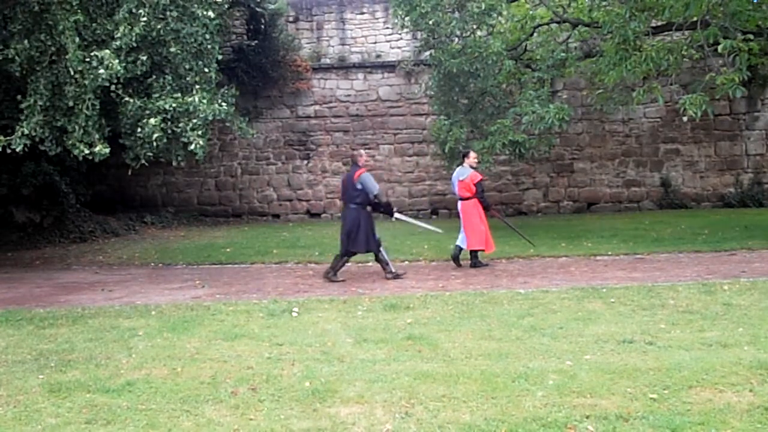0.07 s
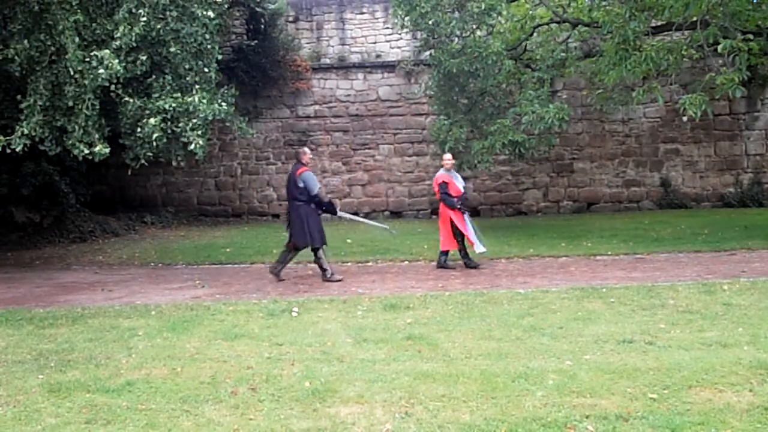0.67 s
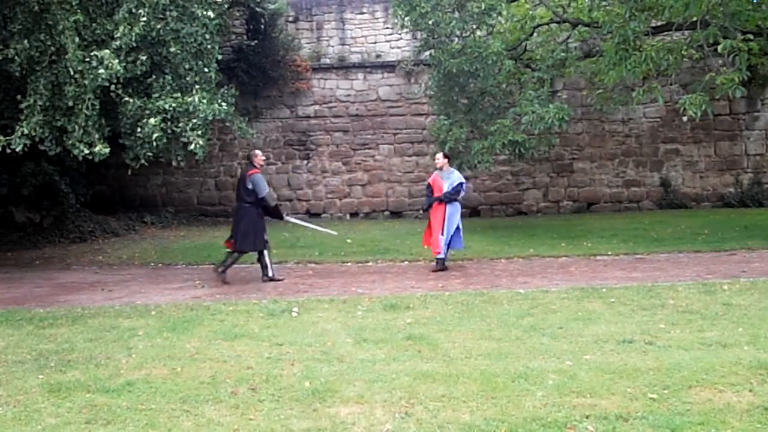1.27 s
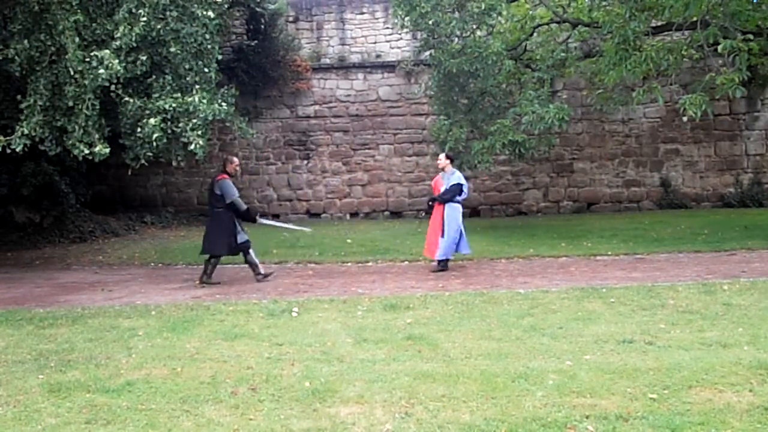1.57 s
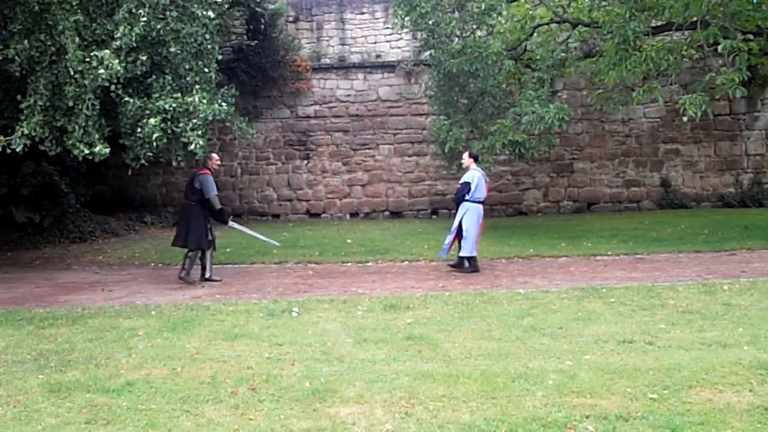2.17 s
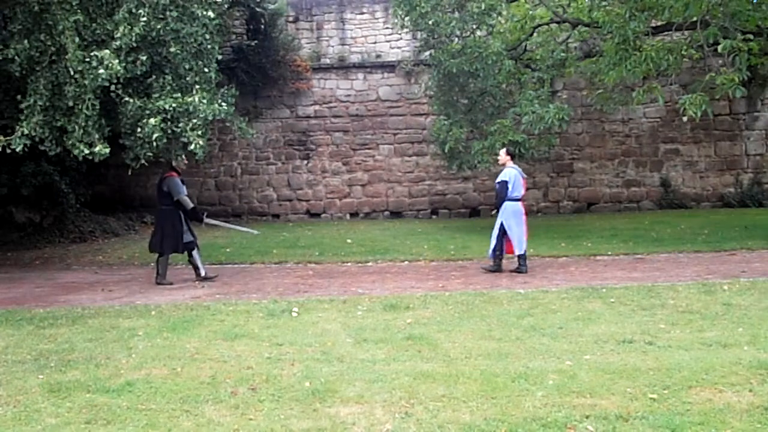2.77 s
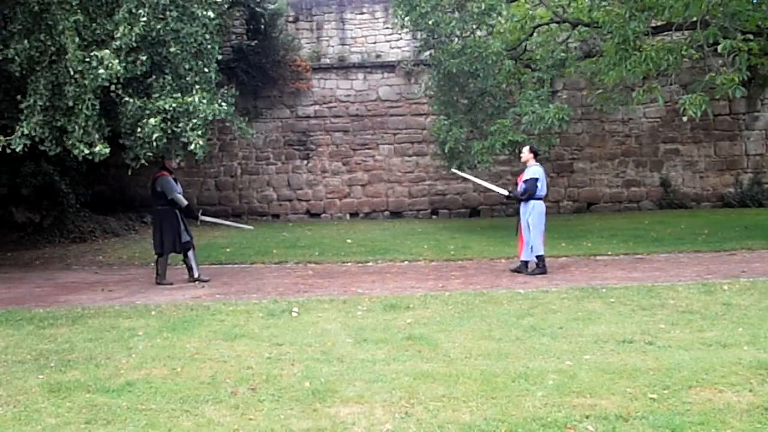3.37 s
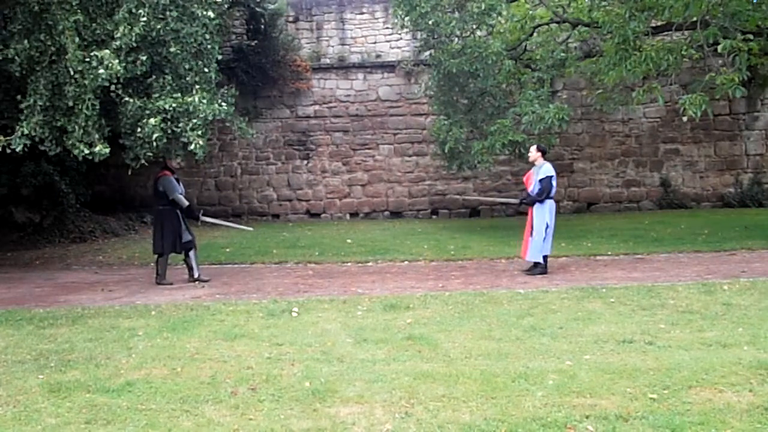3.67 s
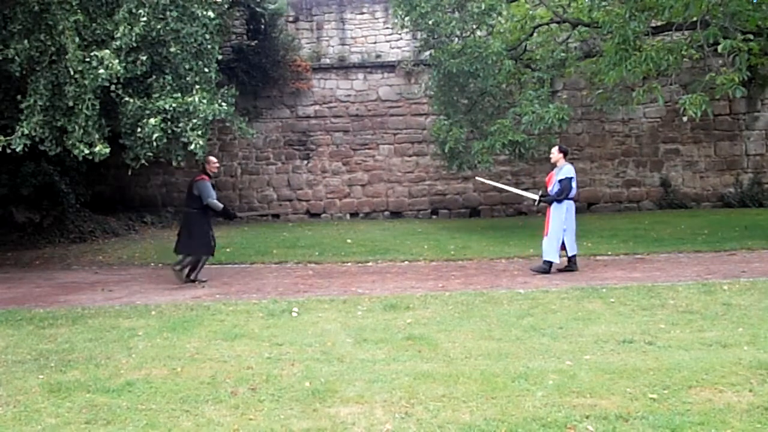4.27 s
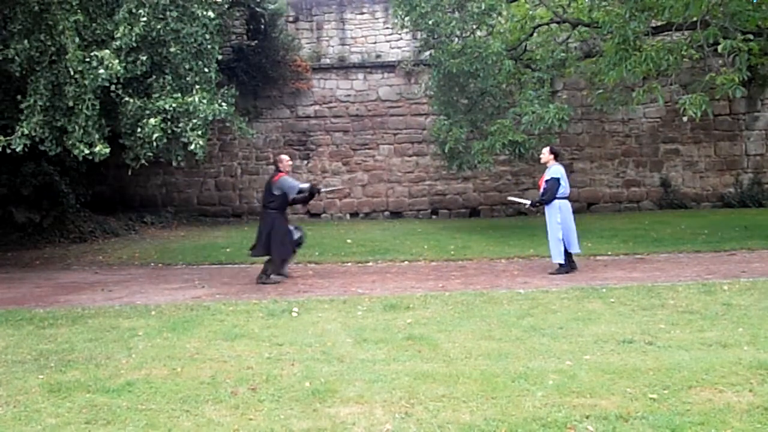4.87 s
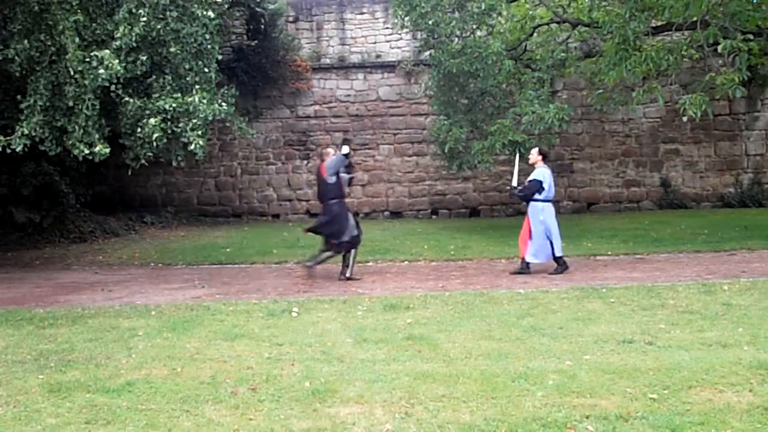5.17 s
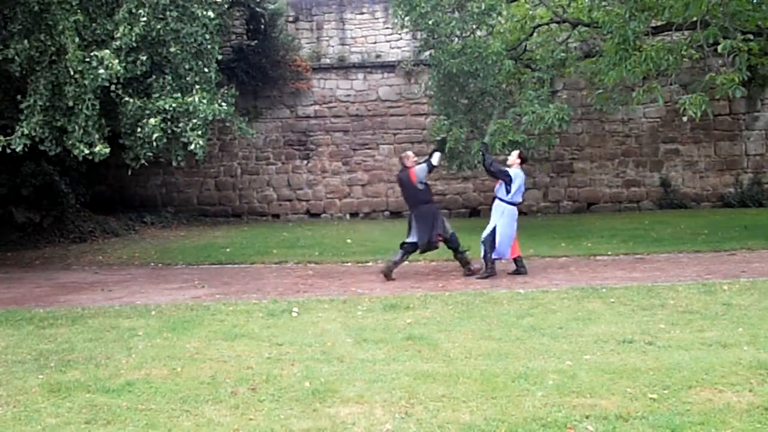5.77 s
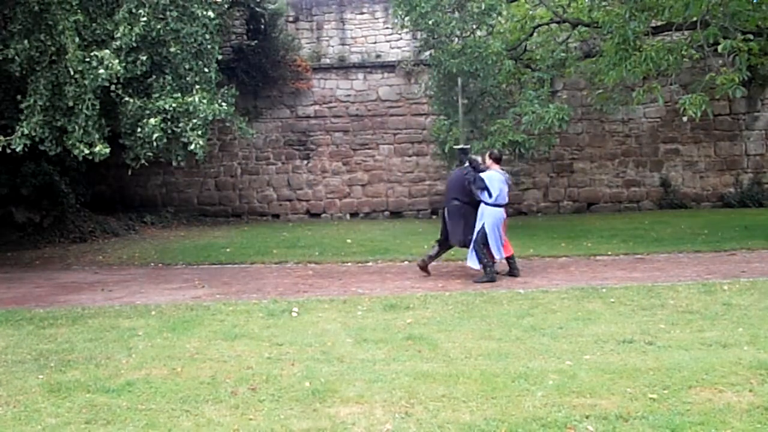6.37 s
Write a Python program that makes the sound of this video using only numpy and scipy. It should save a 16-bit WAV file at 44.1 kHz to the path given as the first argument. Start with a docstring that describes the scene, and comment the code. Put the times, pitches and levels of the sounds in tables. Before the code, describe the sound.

Soft gravel footsteps and light jingling of mail outdoors build to a short rush and a single sharp, ringing sword strike.

```python
"""Two fighters in mail on gravel before a stone wall, in quiet air with a low rumble and soft bumps.
At first a blade still sings faintly from an earlier touch. They circle: boots roll and skid,
mail rustles, pebbles click. Near 3.7 s a distant drone swells and sinks. From 5 s one charges.
At 6 s the swords meet: the edges crack, the blades ring and wobble, wall and trees throw it back."""
import sys
import numpy as np
from scipy import signal
from scipy.fft import rfft, irfft, next_fast_len
from scipy.io import wavfile

SR = 44100
rng = np.random.default_rng(int(sys.argv[2]) if len(sys.argv) > 2 else 0)


def generate_wav(sig):
    """Save sig (samples, or channels by samples) to the path in sys.argv[1] as 16-bit PCM at SR."""
    pcm = np.round(np.clip(np.atleast_2d(sig).T, -1, 1) * 32767).astype(np.int16)
    wavfile.write(sys.argv[1], SR, pcm)


N = 283122
T = np.arange(N) / SR
STRIKE_S, SWORD_LAG_S = 6.0058, 8.2e-5
FIRM_STEP_DB = -55  # reference step level for the thuds

# Stereo likeness of noise. Each row: frequency in Hz, left-right coherence from 0 to 1.
COHERENCE = [(30, 0.94), (250, 0.98), (600, 0.76), (1500, 0.45), (4000, 0.31), (11000, 0.15)]
# Noise spectra. Each row: frequency in Hz, relative level in dB.
AIR_COLOUR = [(20, -11), (60, -8), (123, -6), (184, -6.5), (254, -6), (434, -11.5), (685, -9.5), (944, -13),
              (1570, -13.5), (1890, -13), (4580, -21.5), (9690, -25), (10800, -28), (12000, -51)]
RUMBLE_COLOUR = [(50, -20), (110, -8.5), (150, 0), (190, -5), (265, 0.5), (370, -6.5), (500, -11.5),
                 (900, -44), (2000, -54)]
MAIL_COLOUR = [(1000, -15), (3000, -1.5), (4500, -3.5), (7000, -3), (10000, -5), (11500, -21)]
CRUNCH_COLOUR = [(100, -17), (300, -5), (450, -11), (700, 1), (1000, -7), (1900, 2), (2900, -2),
                 (3800, -7.5), (7000, -20), (12000, -37)]
SCRAPE_COLOUR = [(200, -14), (700, 3), (1200, -10.5), (2300, -2), (3500, 6.5), (5500, 1.5), (7500, -3),
                 (10000, -27), (12000, -59)]
BITE_COLOUR = [(100, -50), (350, -52), (600, -9), (950, -16), (1200, -3), (1700, -10.5), (2500, 1),
               (3200, -3.5), (4600, 4.5), (6500, -6.5), (9500, 1), (11000, -11.5), (12000, -33)]
SHIMMER_COLOUR = [(200, -32), (450, -28.5), (650, -12), (950, -16), (1300, -12), (2500, -5.5), (4700, -0.5),
                  (7200, 2.5), (10000, -1.5), (11000, -11), (11800, -21)]
# Decay of the yard's tail and of the steel's shimmer. Each row: frequency in Hz, T60 in seconds.
YARD_T60 = [(300, 1.0), (2000, 0.95), (5000, 0.46), (11000, 0.54)]
SHIMMER_T60 = [(600, 1.0), (2000, 0.72), (5000, 1), (8000, 0.59), (11000, 0.53)]
# Rumble surges. Each row: peak time in seconds, rise and fall in seconds, level in dB.
SURGES = [(.5, 0.18, -66.5), (.68, 0.088, -67.5), (3.8, 0.21, -68.5), (5.141, .03, -61.5),
          (5.29, 0.086, -60), (6.15, 0.42, -67)]
# Distant drone. Each row: time in seconds, pitch in Hz, level of the fundamental in dB.
DRONE_PATH = [(3.25, 95, -86), (3.45, 114.5, -73), (3.6, 134.9, -73), (3.72, 156.3, -70),
              (3.88, 137.2, -74), (4.1, 110, -86)]
# Blade modes ringing at the start. Each row: frequency in Hz, level in dB, T60 in seconds.
SINGING_MODES = [(1820, -68, .5), (2241, -67, 1.0), (3140, -78, 1.0), (4597, -67, .45), (5087, -65, .5),
                 (6175, -76, .6)]
# Pebble and buckle knocks. Each row: start in seconds, level in dB, pitch in Hz, T60 in seconds.
KNOCKS = [(.527, -55.5, 2700, 0.015), (0.6886, -52, 1450, 0.015), (.78, -49, 2060, .016),
          (.789, -50.5, 880, .011), (0.932, -53, 6900, 0.016), (1.641, -51.5, 1500, 0.0062),
          (1.967, -43, 2370, 0.019), (2.245, -40.5, 1360, 0.01), (2.559, -51, 6240, .008),
          (2.632, -47.5, 3900, .009), (3.099, -50.5, 1940, .01), (3.9936, -45, 2036, 0.0075),
          (3.996, -47, 7000, .01), (4.7176, -50, 1900, 0.013), (4.72, -52.5, 5970, .025),
          (4.914, -51, 4500, 0.035), (5.1114, -49.5, 980, 0.0079), (5.21, -53.5, 4000, .012),
          (5.233, -45.5, 2380, 0.0033), (5.26, -54, 7900, .011), (5.637, -41, 6130, 0.02)]
# Turns and arm swings that slide the mail. Each row: peak time in seconds, fall in seconds, level in dB.
SWINGS = [(0, 0.25, -70.5), (.9, 0.043, -68), (2.2, .06, -72.5), (2.66, 0.44, -81), (3.89, 0.2, -72),
          (4.54, 0.068, -66), (4.73, 0.032, -67.5), (4.98, 0.36, -65.5), (5.7, .2, -69.5)]
# Soles rolling onto gravel. Each row: peak time in seconds, fall in seconds, level in dB.
TREADS = [(.19, 0.068, -67), (.51, .055, -68.5), (.69, .04, -66.5), (1.12, .06, -67), (1.24, 0.079, -67),
          (1.61, 0.064, -66), (2.012, .07, -59.5), (2.308, 0.017, -68.5), (2.609, 0.12, -59.5),
          (3.068, 0.046, -58.5), (3.245, .05, -60), (3.43, 0.019, -66.5), (3.73, 0.2, -72.5),
          (4.14, 0.059, -67), (4.265, 0.037, -63.5), (4.69, .07, -68.5), (4.91, 0.038, -63.5),
          (5.31, 0.095, -55.5), (5.67, 0.073, -55.5), (5.814, 0.064, -52)]
# Boots landing and skidding. Each row: peak time, rise and fall in seconds, level in dB.
SKIDS = [(0.79, 0.0049, 0.079, -62), (1.425, 0.01, .035, -61), (1.48, 0.035, 0.017, -62),
         (1.971, 0.003, 0.056, -54.5), (5.17, 0.027, 0.015, -60), (5.245, 0.0062, 0.017, -57.5),
         (5.5336, .0012, 0.018, -55), (5.556, 0.012, 0.022, -46), (5.638, 0.011, 0.037, -57.5),
         (5.968, 0.036, 0.058, -61)]
# Wall echoes. Each row: delay in seconds, relative level in dB.
WALL_ECHOES = [(.072, -9), (0.121, -17.5), (0.135, -16), (.157, -15.5)]
# Edge biting on edge. Each row: peak time in seconds, level in dB, rise and fall in seconds.
BITES = [(6.0073, -12.5, 0.0012, 0.0052), (6.011, -24.5, 0.0031, 0.0045)]
# Blade bending modes. Each row: frequency in Hz, ring in dB, T60 in seconds, flare before boost in dB.
BLADE_MODES = [(1397, -39, .9, -35), (1415, -44, .95, -43), (1709, -43, 1.7, -56), (1820, -49, 1.2, -49),
               (2013, -46, .8, -52), (2242, -46, 1.1, -44), (2496, -27, .1, -52), (2712, -41, .7, -53),
               (3134, -37, 1.05, -34), (3260, -42, 1.0, -42), (3573, -40, 1.0, -27), (3878, -40, .66, -42),
               (4083, -42, .8, -36), (4603, -33, 1.15, -22), (4634, -39, 1.0, -32), (4802, -36, .5, -36),
               (5086, -38, 1.4, -34), (5102, -33, 1.9, -34), (5281, -37, 1.1, -34), (5611, -33, .75, -25),
               (5797, -36, .7, -33), (6174, -29, .9, -18), (6741, -32, .85, -18.5), (7305, -30, .5, -29),
               (7897, -30, .52, -24), (8440, -33, .65, -37), (8515, -30, .72, -23), (9162, -32, .56, -20),
               (9835, -35, .6, -24), (10512, -34, .52, -25), (11550, -46, .54, -35)]


def gain_of(db):
    """Decibels to gain."""
    return 10 ** (np.asarray(db) / 20)


def unit_rms(x):
    """Scale to rms 1."""
    return x / np.sqrt(np.mean(x ** 2) + 1e-20)


def curve_at(points, hz):
    """Interpolate on a log-frequency axis."""
    points_hz, values = np.transpose(points)
    return np.interp(np.log(hz + 1), np.log(points_hz + 1), values)


def stereo(x, lag_s):
    """An off-centre source reaches the left channel lag_s late."""
    delay = np.sinc(np.arange(-16, 17) - lag_s * SR) * signal.windows.tukey(33)
    return np.array([np.convolve(x, delay, "same"), x])


def noise(colour, lag_s, spread=1., grain_db=0., clump_db=0.):
    """Coloured stereo noise, rms 1, in grains and clumps; spread lowers the coherence."""
    size = next_fast_len(N)
    hz, n = np.fft.rfftfreq(size, 1 / SR), np.arange(size)
    grain, clump = np.minimum(rng.exponential(1, (2, size)), 4)
    texture = gain_of(grain_db * grain[n // 24] + clump_db * clump[n // 190])
    right, unrelated = rfft(rng.standard_normal((2, size)) * texture)
    coherence = np.clip(1 - spread * (1 - curve_at(COHERENCE, hz)), 0, 1)
    left = (coherence * right + np.sqrt(1 - coherence ** 2) * unrelated) * np.exp(-2j * np.pi * hz * lag_s)
    return unit_rms(irfft(np.array([left, right]) * gain_of(curve_at(colour, hz)), size)[:, :N])


def ticks(colour, lag_s, per_s):
    """Sparse sharp ticks of uneven size, rms 1."""
    chance, weight, sign = rng.random((3, N))
    train = (chance < per_s / SR) * np.sign(sign - .5) * (.3 + weight ** 2)
    size = next_fast_len(N)
    spectrum = rfft(train, size) * gain_of(curve_at(colour, np.fft.rfftfreq(size, 1 / SR)))
    return unit_rms(stereo(irfft(spectrum, size)[:N], lag_s))


def band_decay(x, t60_curve, start_s):
    """From start_s on, each band dies at its own rate."""
    hz, t, bands = signal.stft(x, SR, nperseg=256)
    decay = gain_of(-60 * np.maximum(t - start_s, 0) / curve_at(t60_curve, hz)[:, None])
    return signal.istft(bands * decay, SR, nperseg=256)[1][:, :x.shape[1]]


def swell(peak_s, rise_s, fall_s):
    """Exponential rise to 1, then exponential fall."""
    return np.exp(-np.minimum(np.maximum((peak_s - T) / rise_s, (T - peak_s) / fall_s), 20))


def envelope(events):
    """Overlapping swells, added in power."""
    return np.sqrt(sum((gain_of(db) * swell(s, rise_s, fall_s)) ** 2 for s, rise_s, fall_s, db in events))


def air(level_db=-67):
    """Quiet, steady outdoor air."""
    return gain_of(level_db) * noise(AIR_COLOUR, lag_s=0, spread=2.36)


def rumble(thud_db=-67.5, thud_slope=.76, rise_s=.022, fall_s=.027):
    """Low surges, and the ground's dull thud under every step."""
    surges = [(s, width_s, width_s, db) for s, width_s, db in SURGES]
    thuds = [(s, rise_s, fall_s, thud_db + thud_slope * (db - FIRM_STEP_DB)) for s, *_, db in TREADS + SKIDS]
    return envelope(surges + thuds) * noise(RUMBLE_COLOUR, lag_s=0, spread=.48)


def electronic_bumps(gain_db=-55.5, clock_hz=29.97, width_s=.002, jitter_s=.0018):
    """A camera's electronics bump softly on a random half of their cycles."""
    cycles_s = np.arange(-.0065, N / SR, 1 / clock_hz)
    chance, lateness = rng.random((len(cycles_s), 2)).T
    times_s = (cycles_s + jitter_s * (2 * lateness - 1))[chance < .5]
    pulses = np.bincount(np.clip(times_s * SR, 0, N - 1).astype(int), minlength=N)
    bumps = signal.oaconvolve(pulses, signal.windows.gaussian(1001, width_s * SR), "same")
    return -gain_of(gain_db) * signal.filtfilt(*signal.butter(1, 24, "high", fs=SR), bumps)


def drone(octave_db=-5):
    """A far, low tone and its octave glide up and back down."""
    times_s, hz, db = np.transpose(DRONE_PATH)
    phase = 2 * np.pi * np.cumsum(np.interp(T, times_s, hz)) / SR
    level = gain_of(np.interp(T, times_s, db)) * (T > times_s[0]) * (T < times_s[-1])
    return level * (np.sin(phase) + gain_of(octave_db) * np.sin(2 * phase))


def singing_blade():
    """A few faint blade modes fade from the start."""
    modes = (gain_of(db - 60 * T / t60_s) * np.sin(2 * np.pi * hz * T) for hz, db, t60_s in SINGING_MODES)
    return stereo(sum(modes), lag_s=4e-5)


def knocks(upper_ratio=1.316, upper_db=-5, grit_db=-15):
    """Pebbles and buckles knock: two heavily damped modes and a little grit."""
    out = np.zeros(N)
    t = T[:SR // 20]
    for start_s, db, hz, t60_s in KNOCKS:
        ring = np.sin(2 * np.pi * hz * t) + gain_of(upper_db) * np.sin(2 * np.pi * hz * upper_ratio * t)
        grit = gain_of(grit_db) * rng.standard_normal(len(t))
        out[round(start_s * SR):][:len(t)] += gain_of(db - 60 * t / t60_s) * (ring + grit)
    return stereo(out, lag_s=6e-5)


def mail(chink_db=-5, rest_db=-87, jolt_db=-69, jolt_rise_s=.011, jolt_fall_s=.093):
    """Small rings tick together at each skid and swing, never quite still; a few chink louder."""
    rustle = noise(MAIL_COLOUR, lag_s=2e-5, spread=.71, grain_db=1)
    chinks = gain_of(chink_db) * ticks(MAIL_COLOUR, lag_s=2e-5, per_s=59)
    jolts = [(s, jolt_rise_s, jolt_fall_s, jolt_db) for s, *_ in SKIDS]
    slides = [(s, .51 * fall_s, fall_s, db) for s, fall_s, db in SWINGS]
    return np.hypot(envelope(jolts + slides), gain_of(rest_db)) * (rustle + chinks)


def footsteps(skid_crunch_db=-1.5, tread_scrape_db=-16.5, snap_db=-8):
    """Boots press stones together (crunch) and drag grit (scrape); single stones snap free."""
    rolling = envelope((s, .84 * fall_s, fall_s, db) for s, fall_s, db in TREADS)
    skidding = envelope(SKIDS)
    crunch = np.hypot(rolling, gain_of(skid_crunch_db) * skidding)
    scrape = np.hypot(skidding, gain_of(tread_scrape_db) * rolling)
    stones = noise(CRUNCH_COLOUR, lag_s=1e-4, spread=.32, grain_db=2.5, clump_db=2.6)
    stones += gain_of(snap_db) * ticks(CRUNCH_COLOUR, lag_s=1e-4, per_s=130)
    grit = noise(SCRAPE_COLOUR, lag_s=5e-5, spread=.85, grain_db=2)
    grit += gain_of(snap_db) * ticks(SCRAPE_COLOUR, lag_s=5e-5, per_s=140)
    return crunch * stones + scrape * grit


def yard_echoes(clash, tail_db=-16, tail_start_s=.076, smear_s=.0072):
    """The rough wall returns smeared echoes; stones and trees scatter a tail."""
    scatter = noise([(300, -4), (6000, -3.8), (11000, -.15)], lag_s=6e-5)[:, :SR]
    bursts = sum(gain_of(db) * swell(delay_s, .0016, smear_s)[:SR] for delay_s, db in WALL_ECHOES)
    echoes = bursts * scatter / np.sqrt(smear_s * SR / 2)
    tail = band_decay(scatter[:, ::-1], YARD_T60, 0) * (T[:SR] > tail_start_s)
    response = echoes + gain_of(tail_db) * tail / np.linalg.norm(tail[0])
    return signal.fftconvolve(clash[1:], response, axes=1)[:, :N]


def edge_bite(shimmer_db=-23, build_s=.0062, low_cut_hz=420):
    """The edges crack together; dense, weak modes of blades and hilts shimmer on."""
    bursts = sum(gain_of(db) * swell(s, rise_s, fall_s) for s, db, rise_s, fall_s in BITES)
    crack = bursts * noise(BITE_COLOUR, SWORD_LAG_S, spread=.35)
    low_cut = signal.butter(2, low_cut_hz, "high", fs=SR)  # the crack carries little bass
    shimmer = band_decay(noise(SHIMMER_COLOUR, lag_s=7e-5), SHIMMER_T60, STRIKE_S)
    build = 1 - np.exp(-np.maximum(T - STRIKE_S, 0) / build_s)
    return signal.lfilter(*low_cut, crack) + gain_of(shimmer_db) * build * shimmer


def blade_ring(wobble_hz=18.7, wobble_depth=.0022, flare_boost_db=2.5, jangle_hz=30, jangle_depth=.23):
    """Bending modes ring and wobble as the blade whips; each flares as the flat swings past."""
    out = np.zeros(N)
    struck = T > STRIKE_S
    t = T[struck] - STRIKE_S
    wobble_s = wobble_depth * np.cos(2 * np.pi * wobble_hz * t) / (2 * np.pi * wobble_hz)
    low_pass = signal.butter(2, jangle_hz, fs=SR)
    for hz, ring_db, t60_s, flare_db in BLADE_MODES:
        flare_s = .033 * (max(hz, 3000) / 6500) ** -.65  # high modes beam at the listener first
        flare = gain_of(flare_db + flare_boost_db) * np.exp(-.5 * (np.log(t / flare_s) / .33) ** 2)
        ring = gain_of(ring_db - 60 * t / t60_s)
        # the blades stay in contact and jar each other
        jangle = [unit_rms(v) for v in signal.lfilter(*low_pass, rng.standard_normal((2, len(t))))]
        amplitude = np.hypot(ring, flare) + jangle_depth * ring * (jangle[0] + 1j * jangle[1])
        phase = 2 * np.pi * (hz * (t + wobble_s) + rng.random())
        out[struck] += (amplitude * np.exp(1j * phase)).real
    return stereo(out, SWORD_LAG_S)


def scene(ring_to_wall_db=-4):
    """The clash and its echoes over the fighters' moves and the background."""
    ring, bite = blade_ring(), edge_bite()
    echoes = yard_echoes(bite + gain_of(ring_to_wall_db) * ring)  # less ring is beamed at the wall
    fighters = singing_blade() + footsteps() + mail() + knocks()
    background = rumble() + air() + drone() + electronic_bumps()
    return background + fighters + echoes + bite + ring


def record(dry, ceiling=.88, cutoff_hz=11900):
    """Hard-limit the highest peaks, then low-pass."""
    low_pass = signal.firwin(401, cutoff_hz, window=("kaiser", 9), fs=SR)
    return signal.oaconvolve(np.clip(dry, -ceiling, ceiling), low_pass[None], "same", axes=1)


dry = scene()
out = record(dry)
generate_wav(out)
```